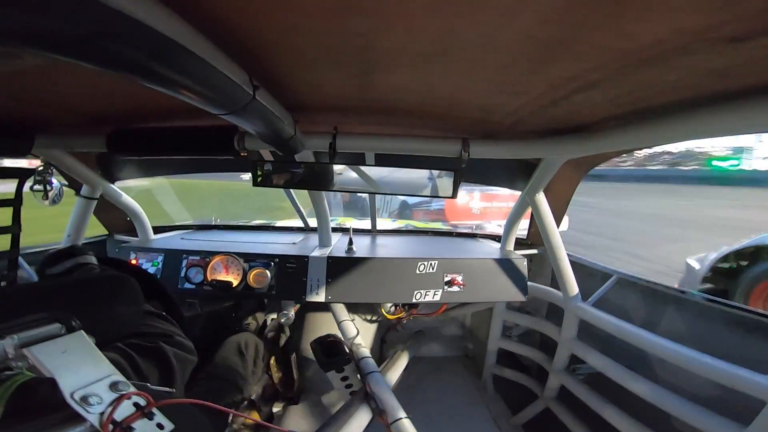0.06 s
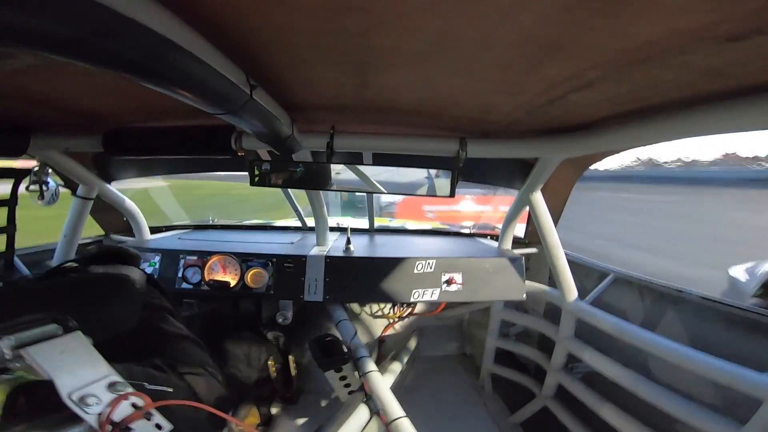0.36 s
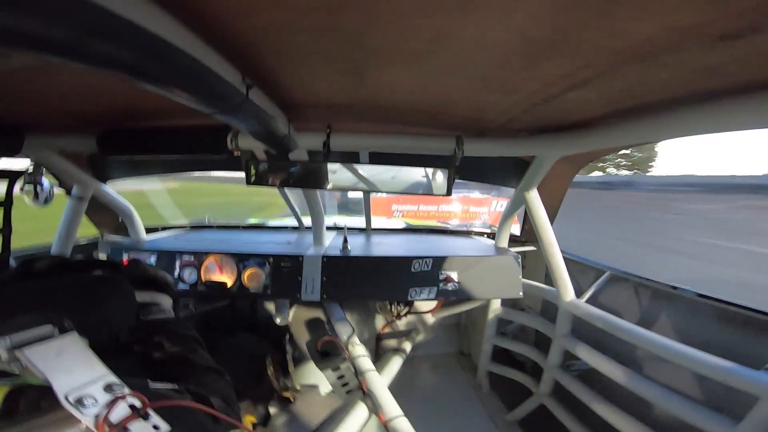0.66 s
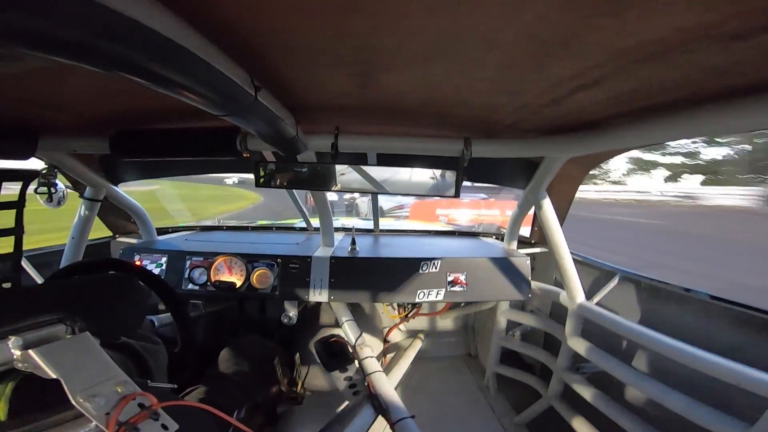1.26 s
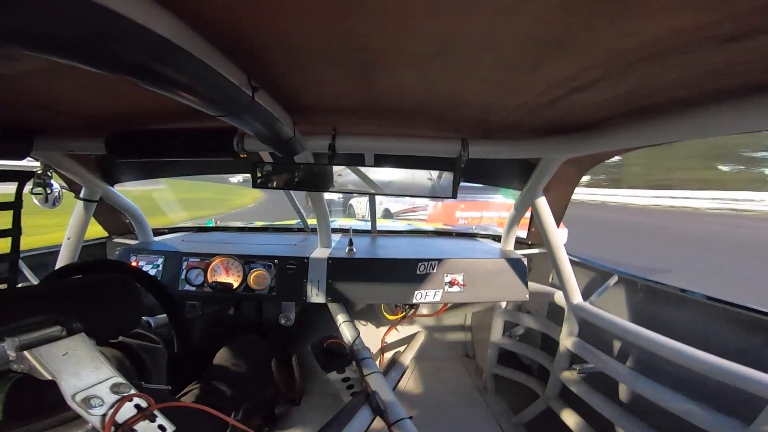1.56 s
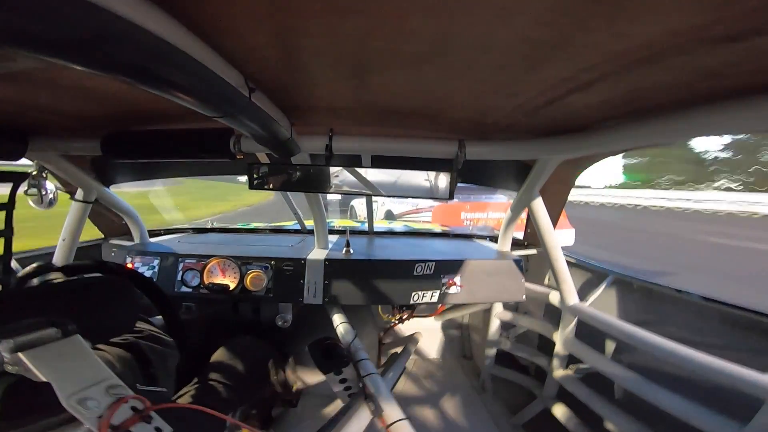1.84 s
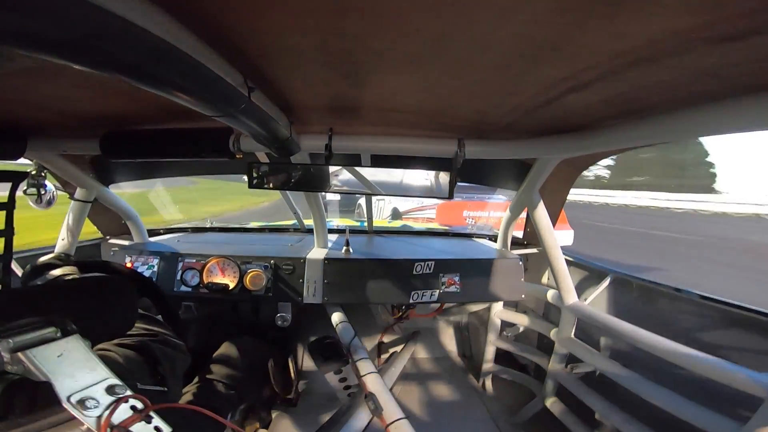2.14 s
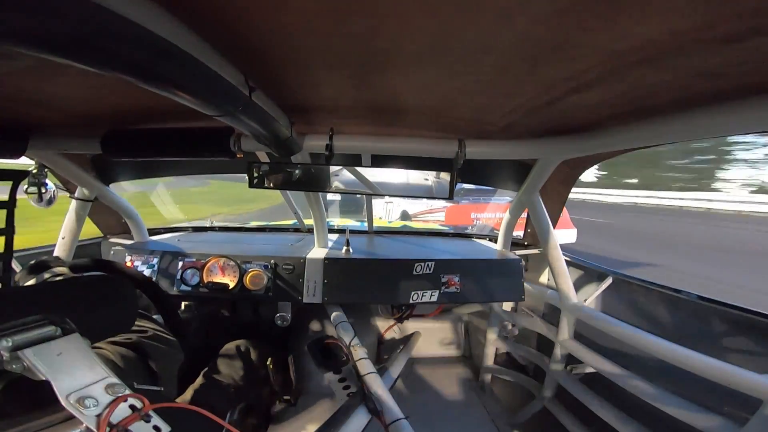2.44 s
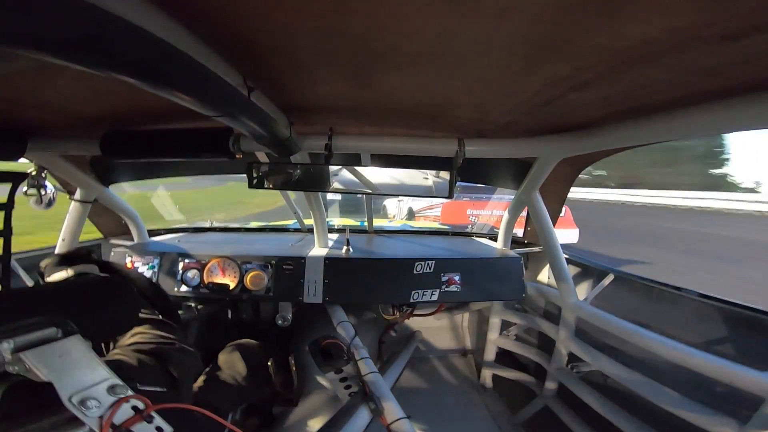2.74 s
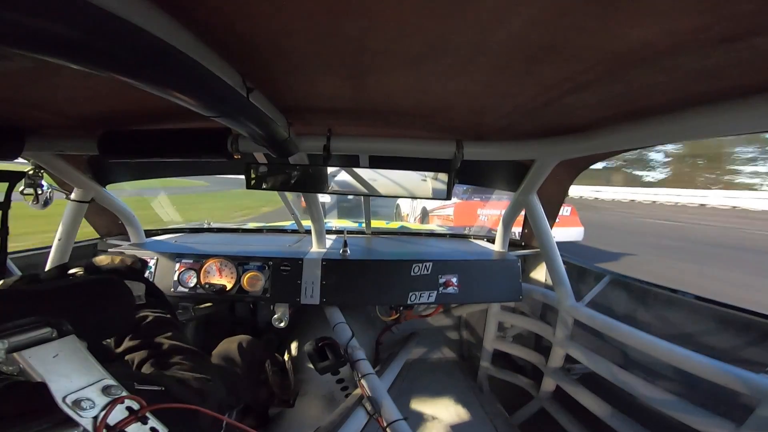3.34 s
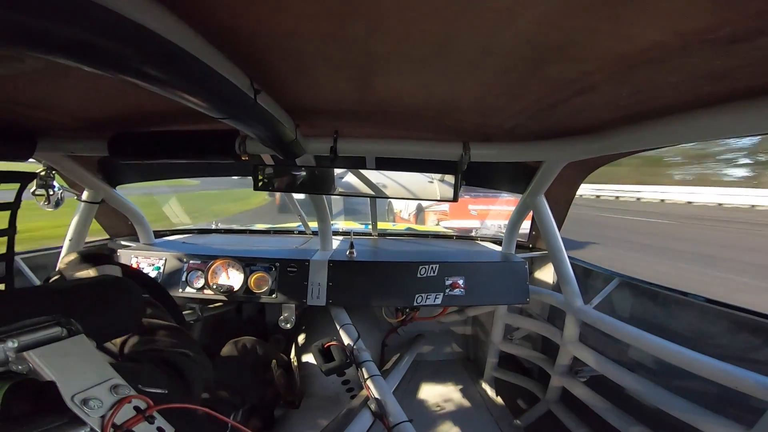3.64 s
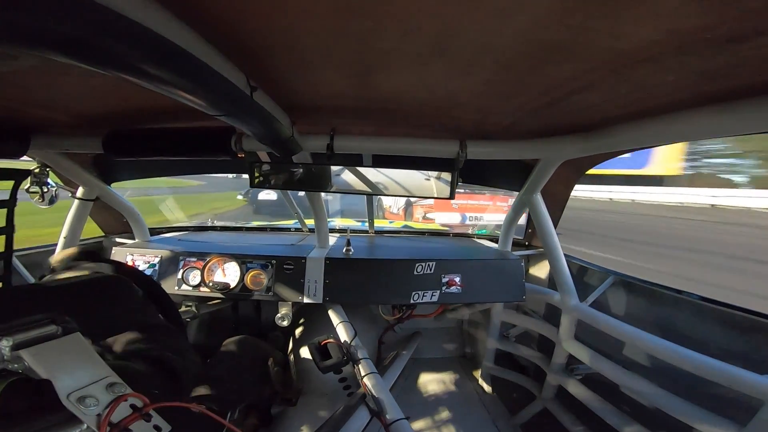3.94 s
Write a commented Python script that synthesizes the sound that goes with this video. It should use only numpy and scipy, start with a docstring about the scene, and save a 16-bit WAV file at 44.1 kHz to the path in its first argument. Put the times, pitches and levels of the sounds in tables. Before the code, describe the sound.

Heard from inside the cockpit on an oval track, a race car engine roars with an uneven, clattering beat. An opening tyre squeal fades as the throttle opens; the revs climb slightly, drop and recover above road rumble.

```python
"""V8 stock car in a bend

Heard from the bare cockpit on an oval. The sliding tyres squeal at first; the driver feeds in
the throttle, lifts twice and picks it up again. The uneven exhaust beat of two cylinder banks
booms in the shell, with engine clatter, road rumble, wind and ticks of grit."""
import sys
import numpy as np
from scipy import signal
from scipy.fft import rfft, irfft
from scipy.io import wavfile
from scipy.ndimage import uniform_filter1d, minimum_filter1d

SR = 44100
rng = np.random.default_rng(int(sys.argv[2]) if len(sys.argv) > 2 else 0)


def store_wav(level_fs):
    """Save 16-bit WAV to argv[1]."""
    pcm = np.round(np.clip(np.atleast_2d(level_fs), -1, 1) * 32767)
    wavfile.write(sys.argv[1], SR, pcm.T.astype(np.int16))


N = 176400


def undb(db):
    """Decibels to gain."""
    return 10 ** (np.asarray(db) / 20)


def unit(x):
    """Scale to rms 1."""
    return x / np.sqrt(np.mean(x ** 2))


def curve(table, column=1):
    """One table column, linear in time."""
    rows = np.array(table, float)
    return np.interp(np.arange(N) / SR, rows[:, 0], rows[:, column])


def colour(x, spectrum):
    """Filter by (frequency [Hz], gain [dB]) points; rms 1."""
    hz, db = np.array(spectrum, float).T
    bins_hz = np.maximum(np.arange(N // 2 + 1) * SR / N, 1)
    gain = undb(np.interp(np.log(bins_hz), np.log(hz), db))
    return unit(irfft(rfft(x) * gain, N))


def noise(spectrum):
    """Coloured noise, rms 1."""
    return colour(rng.standard_normal(N), spectrum)


def walk(rate_hz):
    """Smooth random drift, rms 1."""
    steps = rng.standard_normal(4096)
    x = np.interp(np.arange(N) / SR * rate_hz, np.arange(len(steps)), steps)
    return unit(uniform_filter1d(x, max(int(SR / rate_hz / 2), 1)))


# Engine speed (time [s], four-stroke cycle rate [Hz])
CYCLE_HZ = [(0.0, 31.24), (0.19, 31.41), (0.29, 31.66), (0.48, 30.88), (0.62, 31.45), (1.07, 31.11),
            (1.16, 31.92), (1.39, 31.88), (1.85, 31.27), (2.1, 31.29), (2.23, 32.45), (3.04, 34.74),
            (3.11, 34.77), (3.32, 32.53), (3.54, 32.31), (3.65, 33.34), (3.77, 33.02), (4.0, 33.5)]
# Pedal (time [s], throttle [0-1])
THROTTLE = [(0, 0), (.44, .0), (.5, 0.35), (.56, 0.04), (.76, 0), (.84, 0.5), (1.02, 0.65), (1.3, .72),
            (1.38, 0.51), (1.46, 0.69), (1.62, 0.65), (1.7, 0.07), (1.8, 0.2), (1.87, 0.47), (2.1, 0.68),
            (2.25, 1), (3.17, 1.0), (3.24, .2), (3.6, .18), (3.72, 0.9), (4, 0.99)]
# Combustion unevenness (time [s], roughness [0-1])
ROUGHNESS = [(0, .24), (.7, .16), (.87, .28), (1.25, .13), (1.39, .33), (1.52, .14), (1.9, .34),
             (2.25, .09), (3.12, .07), (3.22, .32), (3.42, .15), (3.65, .28), (3.85, .1)]


def engine():
    """One crankshaft times all engine layers; uneven combustion wobbles its speed."""
    cycle_hz, throttle, roughness = curve(CYCLE_HZ), curve(THROTTLE), curve(ROUGHNESS)
    wobble = 1 + .008 * roughness * walk(25)
    cycles = np.cumsum(cycle_hz * wobble) / SR
    firings = 8 * cycles
    pipes = exhaust(cycles, throttle, roughness) + burble(firings, roughness)
    return pipes + clatter(firings) + whine(cycles, cycle_hz) + rasp(cycles, throttle)


# Exhaust tone, throttle shut to wide open (order [x cycle rate], relative level [dB])
SHUT_DB = [(1, -17.5), (2, -18), (3, -24.5), (4, 3), (5, -5), (6, -8.5), (7, -13), (8, -15.5), (9, -26),
           (10, -24.5), (11, -15.5), (12, -26.5), (13, -13), (14, -20.5), (15, -25.5), (16, -30),
           (17, -25.5)]
TRAILING_DB = [(1, -23.5), (2, -17.5), (3, -19.5), (4, 2), (5, -4), (6, -9.5), (7, -7.5), (8, -10), (9, -9),
               (10, -14.5), (11, -13), (12, -16), (13, -7.5), (14, -18.5), (15, -34.5), (16, -26),
               (17, -13), (18, -34)]
PART_OPEN_DB = [(1, -23), (2, -19.5), (3, -13), (4, -10), (5, 1.5), (6, -2), (7, -5), (8, -1.5), (9, -9.5),
                (10, -12.5), (11, -7), (12, -17), (13, -13), (14, -19.5), (15, -18.5), (16, -11),
                (17, -19.5), (18, -18.5), (19, -16), (20, -23), (21, -25)]
WIDE_OPEN_DB = [(1, -25), (2, -23.5), (3, -12.5), (4, -7.5), (5, 1), (6, -8.5), (7, -3), (8, -2.5),
                (9, -13.5), (10, -15.5), (11, -7.5), (12, -20.5), (13, -8.5), (14, -20), (15, -16),
                (16, -26.5), (17, -15), (18, -21), (19, -33.5), (20, -28.5), (21, -18.5), (22, -27),
                (23, -36)]
# Exhaust loudness (time [s], level [dB])
EXHAUST_DB = [(0, -14.5), (.3, -12), (.45, -14), (.62, -9.5), (.76, -12.5), (.85, -13.5), (1.05, -10.5),
              (1.6, -10.5), (1.67, -12), (1.8, -13.5), (1.87, -11.5), (2.2, -10), (3.15, -11), (3.25, -15),
              (3.52, -10.5), (3.64, -13.5), (3.74, -9.5), (4, -10)]
TONE_THROTTLES = (0, .2, .7, 1)
NEAR_BANK_SLOTS, FAR_BANK_GAIN, PIPE_LAG_RAD = (0, 3, 5, 6), .37, .017


def exhaust(cycles, throttle, roughness):
    """Eight firings a cycle: two unequal banks set each order's phase, throttle blends the tones."""
    slots = np.arange(8)
    bank_gain = np.where(np.isin(slots, NEAR_BANK_SLOTS), 1, FAR_BANK_GAIN)
    tones = np.zeros((len(TONE_THROTTLES), len(WIDE_OPEN_DB)))
    for tone, table in zip(tones, (SHUT_DB, TRAILING_DB, PART_OPEN_DB, WIDE_OPEN_DB)):
        gains = undb([db for _, db in table])
        tone[:len(gains)] = gains * np.sqrt(2 / np.sum(gains ** 2))  # rms 1
    out = 0
    for order, gains in enumerate(tones.T, 1):
        banks = np.sum(bank_gain * np.exp(-2j * np.pi * order * slots / len(slots)))
        bank_rad = np.angle(banks + .0084)  # offset pins the phase where firings cancel
        phase = 2 * np.pi * order * cycles + bank_rad - PIPE_LAG_RAD * order ** 2
        in_phase = (1 + roughness * walk(22.084)) * np.cos(phase)
        quadrature = roughness * walk(22) * np.sin(phase)
        out += np.interp(throttle, TONE_THROTTLES, gains) * (in_phase + quadrature)
    return out * undb(curve(EXHAUST_DB))


# Pipe response (frequency [Hz], gain [dB])
BURBLE_SPECTRUM_DB = [(40, -23.5), (90, -10.5), (130, 4), (220, 12.5), (400, -1), (600, -8.5),
                      (1050, -10.5), (1500, -23), (2500, -36.5), (6000, -69.5), (15000, -100)]


def burble(firings, roughness):
    """Irregular firings: one impulse of random strength each, coloured by the pipes."""
    impulses = np.diff(np.floor(firings), prepend=0) * rng.standard_normal(N)
    return undb(-7.5) * roughness * colour(impulses, BURBLE_SPECTRUM_DB)


# Clatter loudness (time [s], relative level [dB])
CLATTER_DB = [(0, -40), (.25, -38), (.6, -36), (.8, -43), (.9, -43.5), (1.28, -38), (1.6, -41), (2.15, -41),
              (2.3, -35), (2.62, -38.5), (3.05, -37.5), (3.21, -44), (3.35, -39.5), (3.7, -43), (4, -43)]
# Clatter colour (frequency [Hz], gain [dB])
CLATTER_SPECTRUM_DB = [(300, 2.5), (700, 5), (900, -3.5), (1150, 2.5), (1450, -3), (2000, -4), (3000, -10),
                       (4000, -18.5), (4900, -24), (5900, -41.5), (9000, -58.5), (15000, -79)]


def clatter(firings, depth=.45, decay_firings=.35, gain_db=9.5, flicker_db=.6):
    """Engine noise that jumps at each firing and sags until the next."""
    pulses = 1 - depth + depth * np.exp(-(firings % 1) / decay_firings)
    rattle = colour(pulses * rng.standard_normal(N), CLATTER_SPECTRUM_DB)
    return rattle * undb(curve(CLATTER_DB) + gain_db + flicker_db * walk(30))


# Whine partials (order [x cycle rate], level [dB])
WHINE_DB = [(26, -27), (44, -34), (49, -38)]


def whine(cycles, cycle_hz, onset_hz=33.9, full_hz=34.49):
    """Three high engine orders sing out near top speed."""
    fade = np.clip((cycle_hz - onset_hz) / (full_hz - onset_hz), 0, 1)
    return fade * sum(undb(db + 1.3 * walk(20)) * np.sin(2 * np.pi * order * cycles)
                      for order, db in WHINE_DB)


# Cockpit response to the upper orders (frequency [Hz], gain [dB])
RASP_SPECTRUM_DB = [(700, -1.5), (850, -9.5), (1000, 1.5), (1170, 3.5), (1380, -2), (1600, -4),
                    (1800, -5.5), (2100, -15.5), (3500, -22), (8000, -59)]


def rasp(cycles, throttle, full_db=-34, scatter_db=5):
    """Weak upper orders: a ragged pattern repeats each cycle and rings the cockpit under throttle."""
    orders = np.arange(24, 110)
    gains = undb(scatter_db * rng.standard_normal(len(orders)))
    spectrum = np.zeros(4097, complex)
    spectrum[orders] = gains * np.exp(2j * np.pi * rng.random(len(orders)))
    pattern = irfft(spectrum)
    buzz = np.interp(cycles % 1, np.arange(len(pattern)) / len(pattern), pattern)
    return undb(full_db) * np.sqrt(throttle) * colour(buzz, RASP_SPECTRUM_DB)


# Outer tyres (time [s], front pitch [Hz], rear pitch [Hz], front level [dB], rear level [dB])
SQUEAL_HZ_DB = [(0, 920, 693.5, -36, -23), (.1, 935, 735, -26.5, -21.5), (.22, 950, 775, -24.5, -22),
                (.31, 958.4, 770, -18.5, -29.5), (.43, 925, 766, -23.5, -23), (.52, 955, 800, -21, -22.5),
                (.62, 970, 838.5, -26.5, -18), (.7, 945, 865, -26.5, -23), (.77, 909, 884, -18.5, -38),
                (.82, 910, 860, -28, -36), (1.0, 880, 820, -44, -42), (1.2, 880, 820, -77, -81)]
# Tread scrub (frequency [Hz], gain [dB])
SCRUB_SPECTRUM_DB = [(400, -26), (620, -6), (740, 11.5), (960, 5.5), (1100, -11.5), (1400, -19), (1900, -6),
                     (2300, -8.5), (3200, -16.5), (4800, -29), (6000, -52), (15000, -91)]
FRONT_OCTAVE_DB, REAR_OCTAVE_DB = -12.5, -20


def tyres(wander=.011, jitter=.01, flutter_db=3, scrub_db=-4):
    """Two sliding tyres stick and slip at wandering pitches, over the scrub of their treads."""
    front_hz, rear_hz = curve(SQUEAL_HZ_DB, 1), curve(SQUEAL_HZ_DB, 2)
    front, rear = undb(curve(SQUEAL_HZ_DB, 3)), undb(curve(SQUEAL_HZ_DB, 4))
    out = undb(scrub_db) * noise(SCRUB_SPECTRUM_DB) * np.hypot(front, rear)
    for hz, gain, octave_db in ((front_hz, front, FRONT_OCTAVE_DB), (rear_hz, rear, REAR_OCTAVE_DB)):
        pitch_hz = hz * (1 + wander * walk(45) + jitter * walk(250))
        phase = 2 * np.pi * np.cumsum(pitch_hz) / SR
        flutter = unit(undb(flutter_db * walk(30)))
        out += gain * flutter * (np.sin(phase) + undb(octave_db) * np.sin(2 * phase))
    return out


# Rumble loudness (time [s], level [dB])
ROAD_DB = [(0, -17), (.2, -22), (.62, -24), (.85, -25.5), (1.08, -18), (1.3, -19.5), (1.6, -22),
           (1.7, -18.5), (1.92, -22), (2.1, -19.5), (2.55, -30), (2.95, -22), (3.1, -29), (3.22, -22.5),
           (3.45, -21.5), (4, -29.5)]
# Rumble colour (frequency [Hz], gain [dB])
ROAD_SPECTRUM_DB = [(15, -11.5), (30, -5.5), (65, 2.5), (85, 1.5), (130, -3.5), (300, -9), (600, -10.5),
                    (1000, -18), (2000, -31.5), (5000, -66), (15000, -94)]


def road(flicker_db=2.1):
    """The track rumbles through the floor."""
    return noise(ROAD_SPECTRUM_DB) * undb(curve(ROAD_DB) + flicker_db * walk(12))


# Wind loudness (time [s], level [dB])
WIND_DB = [(0, -55), (.1, -54.5), (.45, -58), (.6, -54.5), (.8, -59.5), (.95, -60), (1.08, -57.5),
           (1.35, -58.5), (1.85, -57), (2.05, -58.5), (2.5, -60), (3.15, -59), (3.3, -57), (3.6, -58),
           (3.75, -60.5), (4, -60.5)]
# Colour of wind and grit (frequency [Hz], gain [dB])
HISS_SPECTRUM_DB = [(2000, -5.5), (5000, -1), (5900, -9), (6400, -7), (7200, 0), (8000, 0.5), (9000, -6),
                    (10500, -6.5), (11400, -14.5), (13000, -16.5), (15500, -26)]


def wind(buffet_db=.7):
    """Air buffets and hisses at the open window."""
    return noise(HISS_SPECTRUM_DB) * undb(curve(WIND_DB) + buffet_db * walk(40))


# Grit hits (time [s], level [dB])
GRIT_DB = [(.6, -52), (1.236, -48), (1.865, -51), (2.135, -51), (2.265, -53), (3.328, -51), (3.62, -52)]


def grit(decay_s=.012):
    """Small stones and rubber crumbs tick against the underbody."""
    t = np.arange(N) / SR
    envelope = sum(undb(db) * (t >= hit_s) * np.exp(-np.abs(t - hit_s) / decay_s)
                   for hit_s, db in GRIT_DB)
    return noise(HISS_SPECTRUM_DB) * envelope


def scene():
    """Mono mix in the cockpit."""
    return (engine() + tyres() + road() + wind() + grit())[None]


def record(dry):
    """Fast peak limiter, then a steep low-pass."""
    ceiling, window_samples, cutoff_hz = .92, 256, 15700
    needed_gain = np.minimum(1, ceiling / (np.abs(dry) + 1e-9))
    gain = uniform_filter1d(minimum_filter1d(needed_gain, window_samples), window_samples)
    lowpass = signal.ellip(8, .2, 70, cutoff_hz, fs=SR, output="sos")
    return signal.sosfilt(lowpass, dry * gain)


dry = scene()
out = record(dry)
store_wav(out)
```